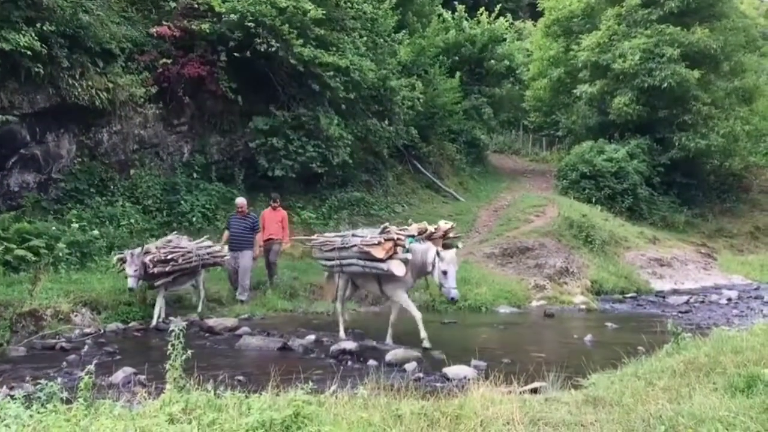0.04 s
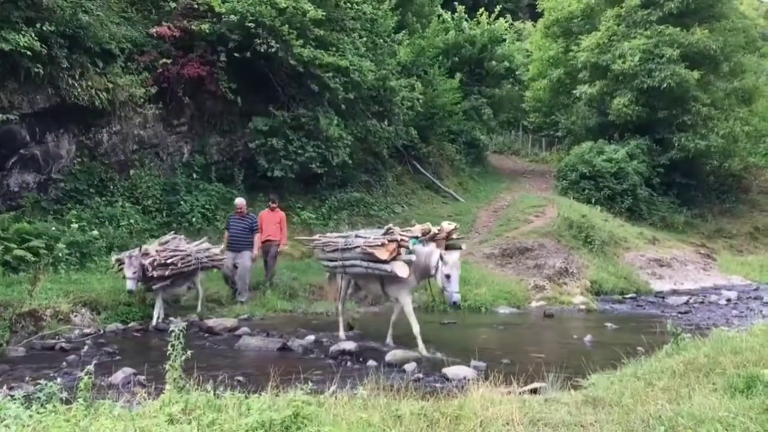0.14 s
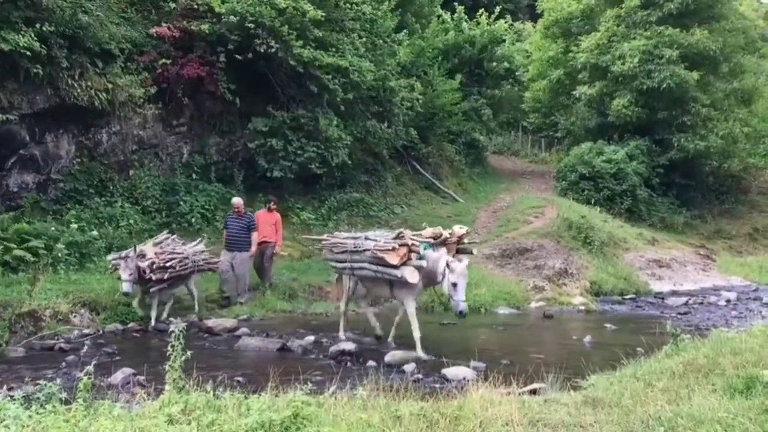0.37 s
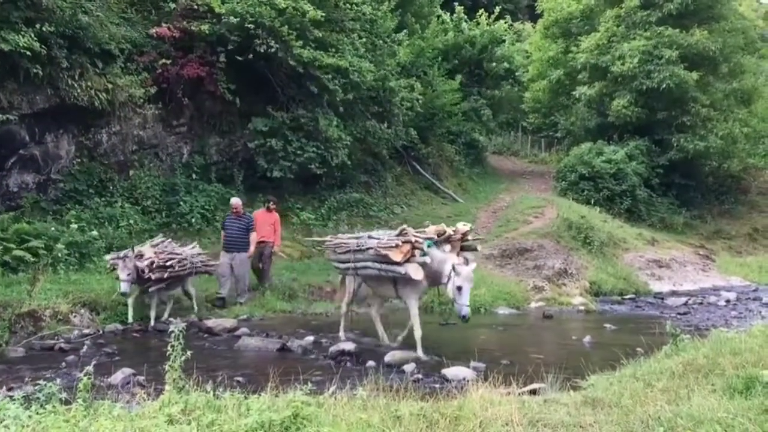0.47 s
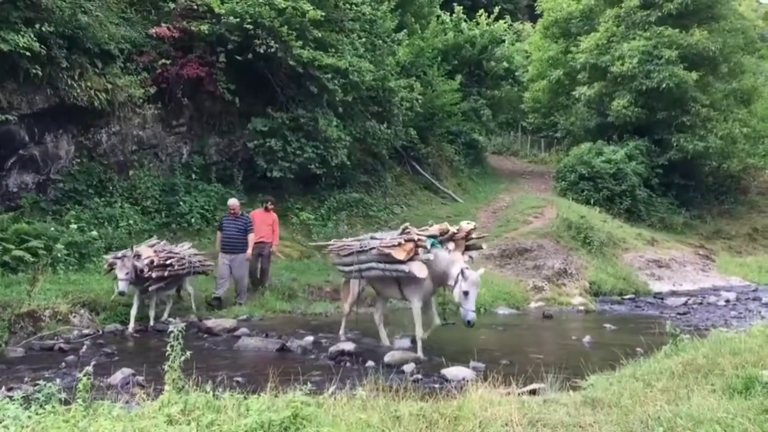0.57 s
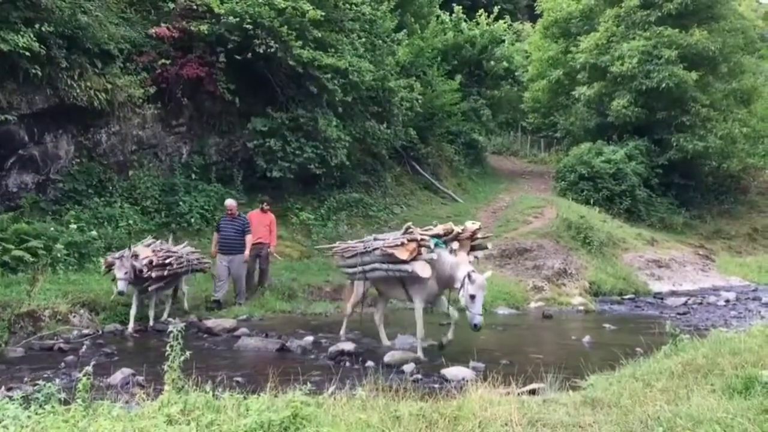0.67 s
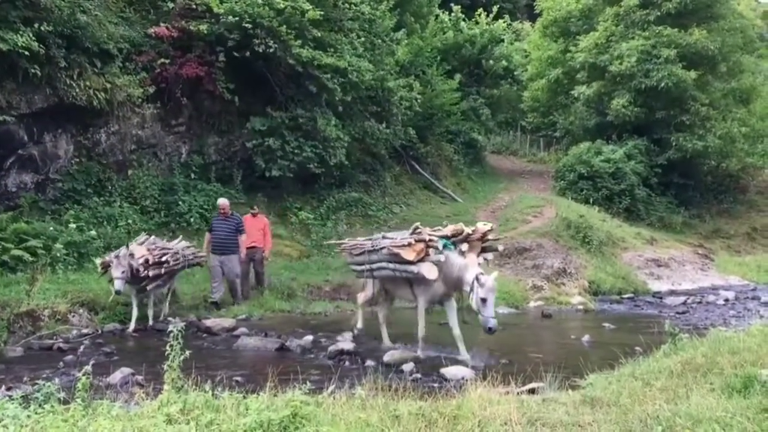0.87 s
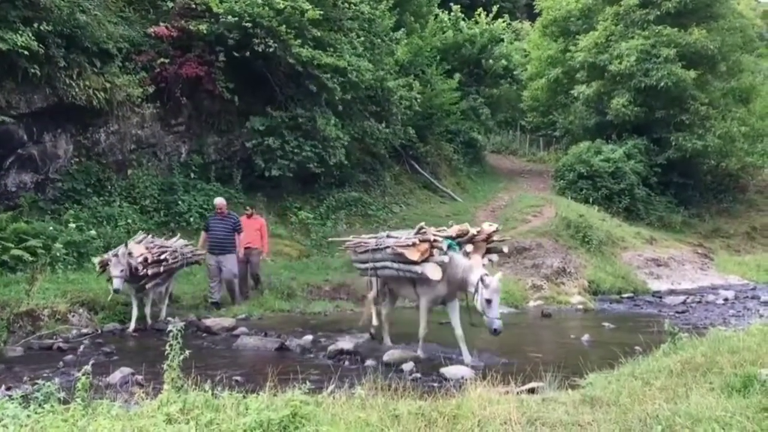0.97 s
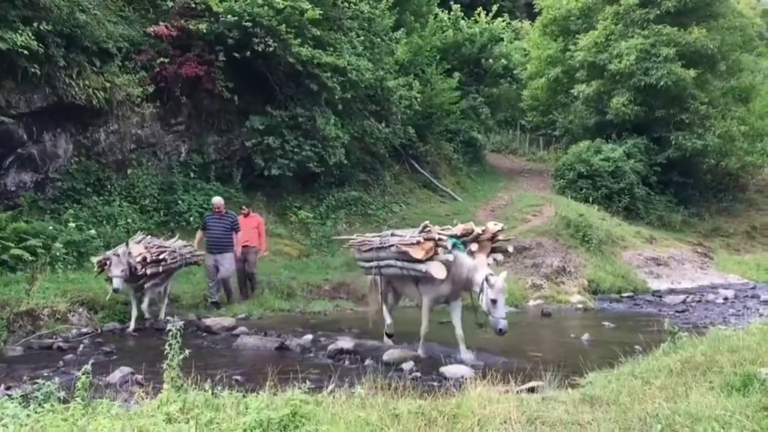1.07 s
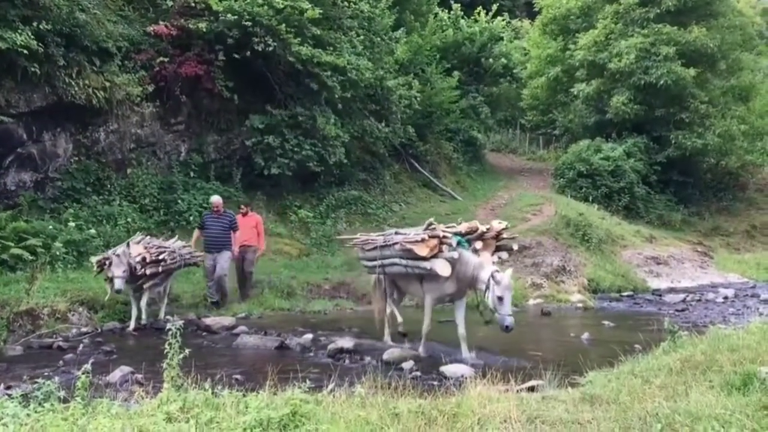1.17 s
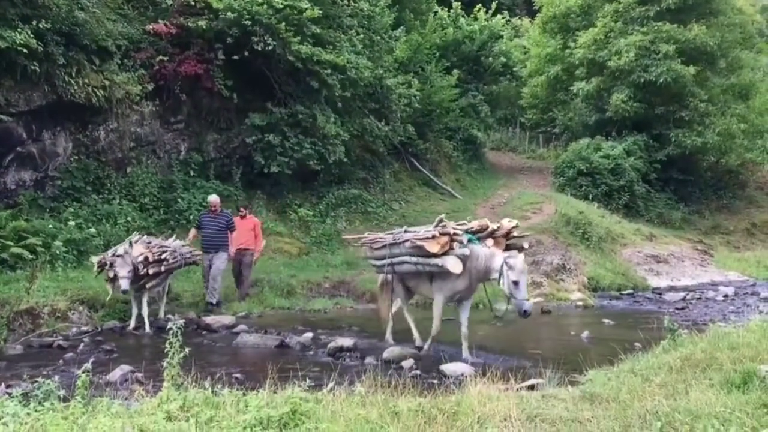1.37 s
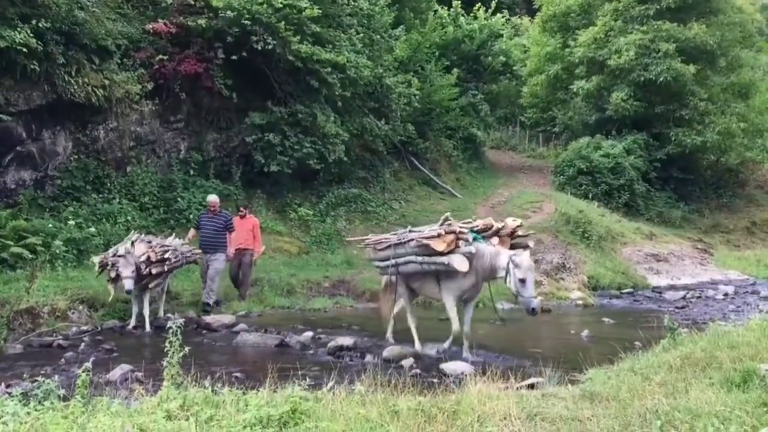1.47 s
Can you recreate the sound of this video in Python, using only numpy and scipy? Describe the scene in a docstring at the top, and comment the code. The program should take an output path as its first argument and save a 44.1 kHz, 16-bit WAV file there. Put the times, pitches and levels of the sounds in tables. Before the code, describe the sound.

A donkey brays once in the open. Until 0.35 s only a shallow stream babbles, with small drips and soft wind pressure. From 0.35 to 0.7 s comes a piercing, wavering whistled in-breath with rushing air; at 0.75 s a hoarse, flapping haw, becoming a clear falling note around 1.07 s, closing by 1.25 s. Water remains, then a raspy gasp at 1.4 s. Loud parts buzz brightly.

```python
"""A shallow stream babbles, then a donkey brays once beside it: a whistling in-breath (hee), a hoarse
out-breath (haw) that turns into a clear falling note, and the start of the next in-breath.
The whistle is a near-sine, the haw pulses and air through throat resonances, the note clean partials.
The stream is patchy noise, small ringing bubbles and drips. A little wind presses on the microphone,
which overloads on the loud parts and adds a bright buzz."""
import sys
import numpy as np
from scipy import signal
from scipy.fft import rfft, irfft
from scipy.io import wavfile
from scipy.ndimage import uniform_filter1d

SR = 44100
rng = np.random.default_rng(int(sys.argv[2]) if len(sys.argv) > 2 else 0)


def magnitude_from_level(level_db):
    """Linear magnitude for a level in decibels (20 dB per decade)."""
    exponent = np.asarray(level_db, float) / 20
    return 10 ** exponent


def persist_wave(psi):
    """Save psi, clipped to +-1, as 16-bit WAV."""
    counts = np.round(np.clip(psi, -1, 1) * 32767).astype(np.int16)
    wavfile.write(sys.argv[1], SR, np.atleast_2d(counts).T)


N = 66150
T = np.arange(N) / SR


def evened(x):
    """Scales to rms 1."""
    return x / np.sqrt(np.mean(x ** 2) + 1e-20)


def read(points, hz):
    """Reads a spectrum table on a log frequency axis."""
    table_hz, value = np.transpose(points)
    return np.interp(np.log(hz + 1), np.log(table_hz + 1), value)


def curves(rows):
    """Columns of a table along time, then a mask of where the table sounds."""
    cols = np.transpose(rows)
    on = (T > cols[0][0]) & (T < cols[0][-1])
    return [np.interp(T, cols[0], c) for c in cols[1:]] + [on]


def slow(hz):
    """Random wander up to about hz, rms 1: noise through a double-pole lowpass."""
    r = np.exp(-2 * np.pi * hz / SR)
    return evened(signal.lfilter([1], [1, -2 * r, r * r], rng.standard_normal(N)))


def phase(hz):
    """Running phase in radians of a changing pitch."""
    return 2 * np.pi * np.cumsum(hz) / SR


def throat(x, table):
    """Sum of steep fixed resonances."""
    f = np.fft.rfftfreq(N, 1 / SR)
    shape = sum(magnitude_from_level(db) / (1 + 1j * (f / hz - hz / (f + 1)) * hz / width) ** 2 for hz, width, db in table)
    return irfft(rfft(x) * shape, N)


# in-breath whistle [start_s, pitch_hz, level_db]
WHISTLE = [(.335, 2400, -76), (.35, 2467, -40), (.364, 2400, -34), (.382, 2425, -22.5), (.41, 2435, -21.5),
           (.438, 2406, -27), (.456, 2392, -26), (.476, 2372, -34.5), (.52, 2373, -37.5), (.555, 2330, -33),
           (.572, 2318, -29.5), (.586, 2256, -20.5), (.604, 2280, -20.5), (.632, 2282, -19.5),
           (.652, 2310, -24), (.668, 2267, -18.5), (.678, 2290, -23.5), (.692, 2290, -51),
           (.728, 2256, -49.5), (.735, 2193, -71)]
# air rushing in through the throat, one table per in-breath [start_s, level_db]
RUSHES = [
    [(0.36, -75), (0.37, -45), (0.42, -50), (0.432, -33), (0.444, -46), (0.452, -38), (0.514, -33),
     (0.52, -37), (0.586, -28.5), (0.6, -38.5), (0.7, -50), (0.72, -66)],
    [(1.39, -57), (1.394, -63), (1.402, -73), (1.406, -58), (1.426, -40), (1.46, -48), (1.466, -56),
     (1.472, -44), (1.478, -48), (1.484, -71), (1.49, -34)],
]
# throat resonances of the first in-breath [centre_hz, width_hz, gain_db]
RUSH_THROAT = [(685, 610, -14), (1300, 176, 2.5), (1750, 330, 0.5), (2380, 224, -1.5), (3420, 250, -9)]
# narrower throat at the start of the next in-breath [centre_hz, width_hz, gain_db]
GASP_THROAT = [(1170, 200, -10.5), (1834, 110, -1.5), (2217, 55, -1.5), (3400, 790, -17)]


def hee():
    """Near-sine whistle with a weak second partial, plus resonated noise of rushing air."""
    waver_share, octave_db = .0015, -33.5
    hz, db, on = curves(WHISTLE)
    a = phase(hz * (1 + waver_share * slow(44)))
    whistle = on * magnitude_from_level(db) * np.sqrt(2) * (np.sin(a) + magnitude_from_level(octave_db) * np.sin(2 * a))
    rush = 0
    for rows, shape in zip(RUSHES, (RUSH_THROAT, GASP_THROAT)):
        rush_db, rush_on = curves(rows)
        rush = rush + magnitude_from_level(rush_db) * rush_on * evened(throat(rng.standard_normal(N), shape))
    return whistle + rush


# hoarse out-breath [start_s, level_db (before the final division), pitch_hz, low_resonance_gain_db]
HOARSE = [(.73, -57, 439.8, 6), (.745, -29.5, 464.4, 15.5), (.76, -25, 469.8, 11.5), (.785, -23, 440.4, 4),
          (.81, -17.5, 400, 0), (.88, -20, 444.5, 4), (.95, -21.5, 445.7, 3), (1.04, -19, 425.5, -0.5),
          (1.07, -19.5, 414.3, -1), (1.1, -31.5, 422, -3), (1.17, -18, 414.8, -35), (1.205, -26.5, 361, -1),
          (1.225, -24, 341, -5.5), (1.245, -30, 371.8, 1), (1.265, -36, 378, 15.5), (1.3, -55, 353.8, 11)]
# low and high throat resonances [centre_hz, width_hz, gain_db]
HOARSE_LOW = [(400, 122, -14.5), (898, 149, -11), (650, 86, -13.5)]
HOARSE_HIGH = [(1241, 69, 2), (1397, 123, 0), (1698, 164, -4.5), (2254, 160, -17.5), (2576, 71, -20.5),
               (3414, 430, -24)]
# strongest flaps of loose tissue [start_s, strength_db]
FLAPS = [(0.7632, -6), (0.7733, -7.5), (0.7854, -13), (0.7916, -16), (0.8018, -16.5), (0.82, -18.5),
         (0.836, -19), (0.8466, -16), (0.859, -14.5), (0.8716, -13.5), (0.885, -18.5), (0.8964, -17),
         (0.9044, -15), (0.9163, -14), (0.9287, -9), (0.9491, -12), (0.9666, -21), (0.9802, -16),
         (0.9903, -15), (1.005, -20.5), (1.0183, -12.5), (1.0271, -20), (1.037, -14.5), (1.0448, -21.5),
         (1.0556, -13), (1.0604, -17.5)]
# main throat resonance that each flap sets ringing [start_s, ring_hz]
RING = [(.75, 1270), (.78, 1290), (.8, 1370), (.83, 1280), (.86, 1360), (.9, 1370), (.93, 1330),
        (.96, 1330), (1.0, 1370), (1.04, 1340), (1.07, 1330)]


def hoarse():
    """Unsteady pulses and air through the throat; loose tissue flaps, swelling the roar and ringing it."""
    jitter_share, air_share, steadying = .1, .59, .38
    rise_s, width_s, reference_db, boost = .0035, .0047, -16, 1.1
    ring_db, ring_waver_share, gap_share = 1, .009, .5
    db, hz, low_db, on = curves(HOARSE)
    a = phase(hz * (1 + jitter_share * slow(300.7)))
    pulses = evened(sum(np.cos(k * a) for k in range(1, 10)))
    drive = (1 - air_share) * pulses + air_share * rng.standard_normal(N)
    flap = boost * sum(magnitude_from_level(strength_db - reference_db) * np.exp(-((T - s - rise_s) / width_s) ** 2)
                       for s, strength_db in FLAPS)
    high = throat(drive, HOARSE_HIGH)
    low = magnitude_from_level(low_db) * throat(drive, HOARSE_LOW)
    scale = np.std(high)
    # partly evens out the roar's random level, so the flaps stand out
    even = (uniform_filter1d(high ** 2, size=130) / scale ** 2 + .029) ** (-steadying / 2)
    roar = high * even * (gap_share + .5 * flap)
    ring_hz = curves(RING)[0] * (1 + ring_waver_share * slow(159.5))
    ring = np.sin(phase(ring_hz)) * magnitude_from_level(ring_db) * scale
    return on * magnitude_from_level(db) * (roar + ring * flap + low) / scale / 1.863


# clear falling note [start_s, pitch_hz, level_db, mouth_closing_0_to_1]
NOTE = [(1.045, 309.3, -61, 0.1), (1.07, 301.8, -22.5, 0.02), (1.106, 297.8, -22, 0.15),
        (1.125, 293.8, -22, 0.44), (1.142, 290.7, -19.5, 0.35), (1.155, 285.6, -27, 0.99),
        (1.19, 285, -26.5, 1), (1.21, 276.7, -35.5, 1), (1.24, 273.7, -32, .95)]
# mouth spectra, weighted in dB by the closing [freq_hz, gain_db]
OPEN_MOUTH = [(150, -54), (250, -20), (437, -29), (902, -8.5), (1070, -32), (1180, -14), (1510, 0),
              (1810, -8), (2000, -11.5), (2390, -10), (2640, -45), (2990, -30), (4420, -21), (7000, -30),
              (9100, -72), (15400, -120)]
CLOSING_MOUTH = [(150, -53), (250, -20), (545, 3), (833, -13), (1160, 3), (1430, -12.5), (1730, -11.5),
                 (2330, -40), (2780, -24), (3280, -14.5), (4200, -64), (5460, -77), (9240, -120)]


def note():
    """Steady folds: 22 clean partials coloured by a mouth that closes."""
    waver_share, shimmer_db = .0099, 1.8
    hz, db, shut, on = curves(NOTE)
    a = phase(hz * (1 + waver_share * slow(80)))
    tone, power = 0, 0
    for k in range(1, 23):
        gain = magnitude_from_level((1.5 - shut) * read(OPEN_MOUTH, k * hz) + shut * read(CLOSING_MOUTH, k * hz))
        shimmer = magnitude_from_level(shimmer_db * slow(90))
        tone = tone + gain * shimmer * np.sin(k * a + .58 * (k - 1) ** 2)
        power = power + gain ** 2 / 2
    return on * magnitude_from_level(db) * tone / np.sqrt(power)


def field(x):
    """Adds faint scatter from banks and trees: a decaying noise tail."""
    t60_s, delay_s, scatter_db = .14, .008, -17
    tail = rng.standard_normal(N) * magnitude_from_level(-60 * T / t60_s) * (T > delay_s)
    return x + magnitude_from_level(scatter_db) * signal.fftconvolve(x, tail / np.linalg.norm(tail))[:N]


def bubble(hz, cycles):
    """A short ringing bubble that rises in pitch."""
    u = np.arange(round(cycles * SR / hz)) * hz / SR
    return np.sin(2 * np.pi * u * (1 + .0067 * u)) * np.sin(np.pi * (u / cycles) ** .43) ** 2


def babble():
    """Random small bubbles of 20 sizes, the higher ones weaker."""
    per_s, level_db = 500, -58.5
    total = 0
    for hz in np.geomspace(300, 5000, 20):
        strength = magnitude_from_level(8.5 * np.minimum(rng.exponential(1, N), 4))
        hits = strength * (rng.random(N) < per_s / 20 / SR)
        total = total + signal.oaconvolve(hits, bubble(hz, 8.3) * 900 / (hz + 900))[:N]
    return magnitude_from_level(level_db) * evened(total)


# wash spectrum [freq_hz, density_db_per_hz (relative)]
STREAM = [(15, -42), (30, 9.5), (60, -6), (150, -11), (260, -1), (450, -4.5), (800, -6), (1300, -6),
          (2000, -8), (3700, -17), (7000, -25.5), (15500, -36.5)]


def wash():
    """Noise with random patches in time and frequency; the treble flickers."""
    level_db, patch_db, flicker_db = -47, 1.46, 1.9
    frames, hz = N // 256 + 5, np.fft.rfftfreq(1024, 1 / SR)
    real, imag, patch = rng.standard_normal((frames, 513, 3)).T
    patch = evened(uniform_filter1d(uniform_filter1d(patch, size=14, axis=0), size=8, axis=1))
    flicker = evened(uniform_filter1d(rng.standard_normal(frames), size=3))
    treble = hz[:, None] > 3000
    gain_db = read(STREAM, hz)[:, None] + patch_db * patch + flicker_db * flicker * treble
    z = (real + 1j * imag) * magnitude_from_level(gain_db)
    return magnitude_from_level(level_db) * evened(signal.istft(z, nperseg=1024, noverlap=768)[1][:N])


# splashes and drips [start_s, peak_db, pitch_hz]
DRIPS = [(.11, -39, 1590), (.138, -40.5, 660), (0.144, -38.5, 1220), (.151, -38, 3600), (.209, -37.5, 721),
         (1.298, -37, 1300), (1.319, -42, 1470), (1.448, -35, 3000)]


def stream():
    """Wash and babble, plus a few clear drips: each a bubble with a puff of spray."""
    spray_db, spray_s = -20, .002
    out = wash() + babble()
    spray = np.diff(rng.standard_normal(N + 1))
    for s, db, hz in DRIPS:
        drop = magnitude_from_level(db) * bubble(hz, 8.6)
        part = out[round(s * SR):][:len(drop)]
        part += drop[:len(part)]
        out += magnitude_from_level(db + spray_db) * spray * np.exp(-((T - s) / spray_s) ** 2)
    return out


def wind():
    """Slow pressure on the microphone membrane and one low thump."""
    gust_s, gust_db, rise_s, fall_s = .2, -23, .081, .5
    thump_s, thump_db, thump_hz, thump_width_s = 1.451, -36.5, 64.6, .011
    t = np.maximum(T - gust_s, 0)
    push = (1 - np.exp(-t / rise_s)) * np.exp(-t / fall_s)
    u = T - thump_s
    thump = np.cos(2 * np.pi * thump_hz * u) * np.exp(-(u / thump_width_s) ** 2)
    return magnitude_from_level(thump_db) * thump - magnitude_from_level(gust_db) * push


def scene():
    """Donkey in the open, stream, wind."""
    bray = hee() + hoarse() + note()
    return (field(bray) + stream() + wind())[None]


# buzz spectrum [freq_hz, gain_db]
BUZZ = [(2500, -51), (3800, -19.5), (4800, -6), (5800, 0.5), (7000, -3.5), (8700, -12), (10000, -2.5),
        (12000, 10.5), (14000, -12), (15500, 5), (16500, -47)]


def overload(dry):
    """Bright buzz of the microphone: what passes the knee, growing with level, then filtered."""
    knee, buzz_db, growth_power = magnitude_from_level(-26), -1, .46
    voice = signal.lfilter(*signal.butter(1, 120, "high", fs=SR), dry)
    level = np.sqrt(abs(uniform_filter1d(voice ** 2, size=90))) / knee
    over = (voice - np.clip(voice, -knee, knee)) * level ** growth_power
    shape = magnitude_from_level(read(BUZZ, np.fft.rfftfreq(N, 1 / SR)))
    return magnitude_from_level(buzz_db) * irfft(rfft(over) * shape, N)


def roll_off(x):
    """The treble ends steeply here."""
    return signal.sosfilt(signal.butter(12, 15690, fs=SR, output="sos"), x)


def record(dry):
    """The microphone adds its overload buzz to the scene."""
    mix = dry + overload(dry)
    return roll_off(mix)


dry = scene()
out = record(dry)
persist_wave(out)
```